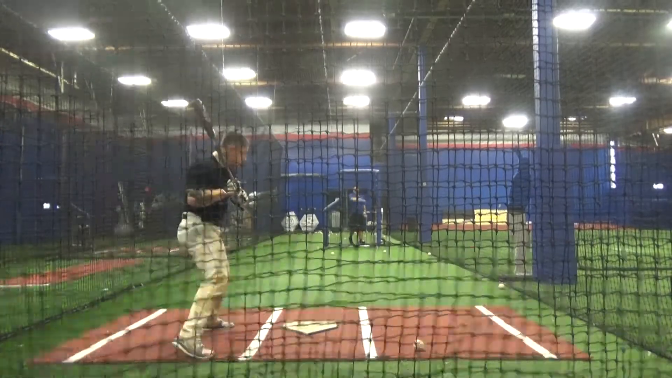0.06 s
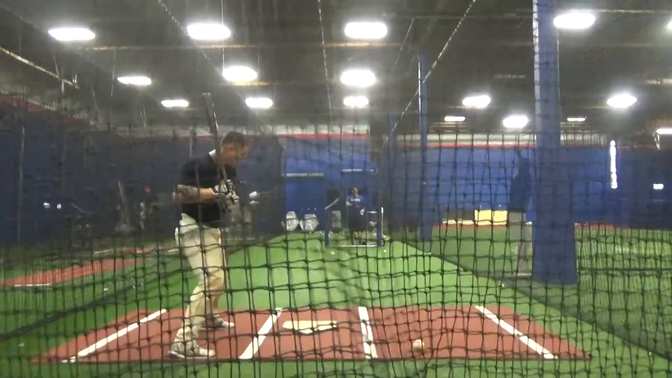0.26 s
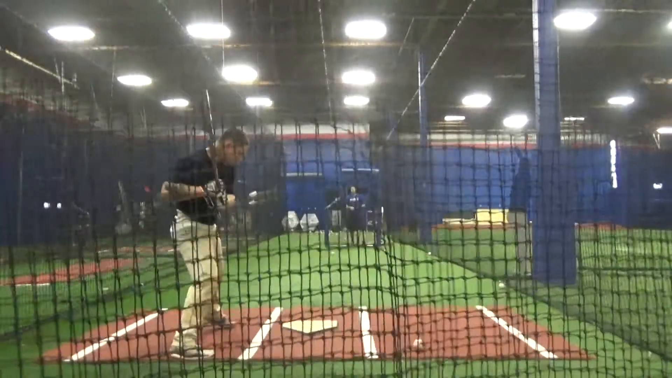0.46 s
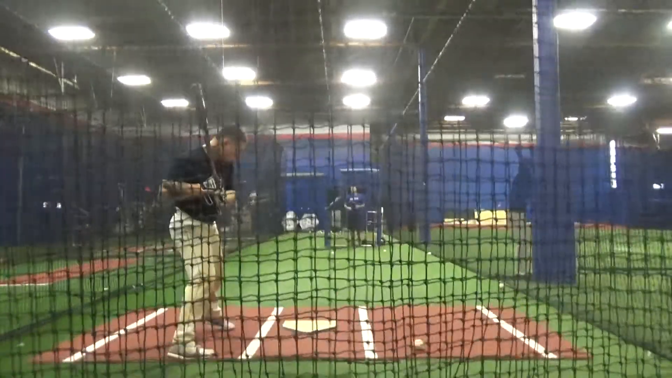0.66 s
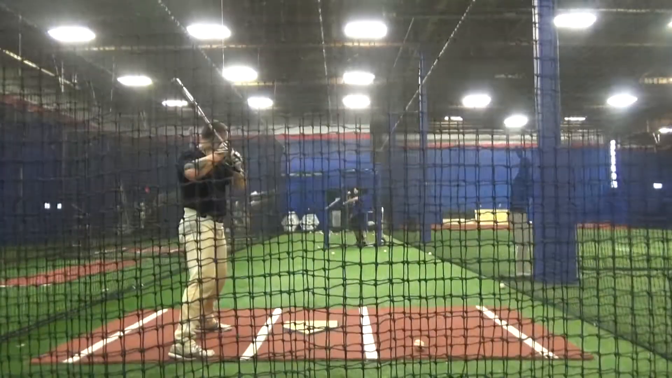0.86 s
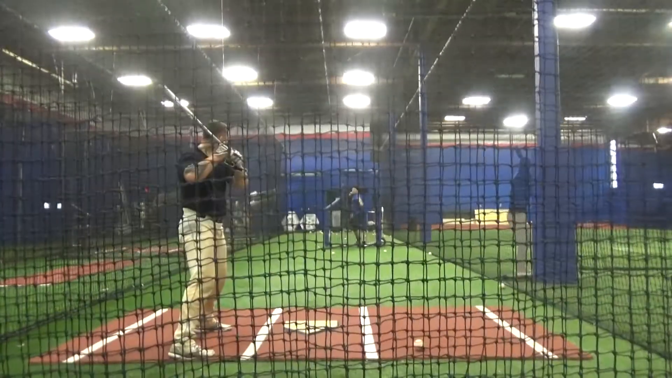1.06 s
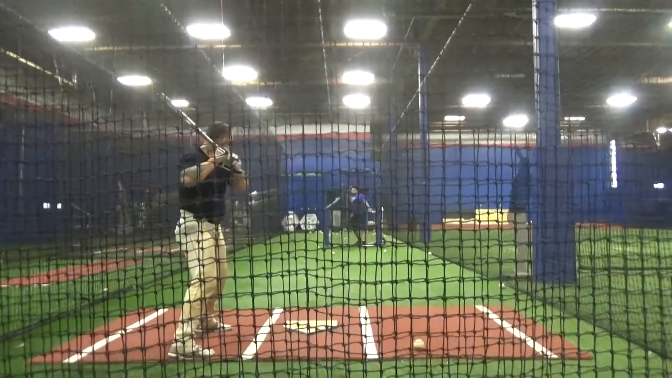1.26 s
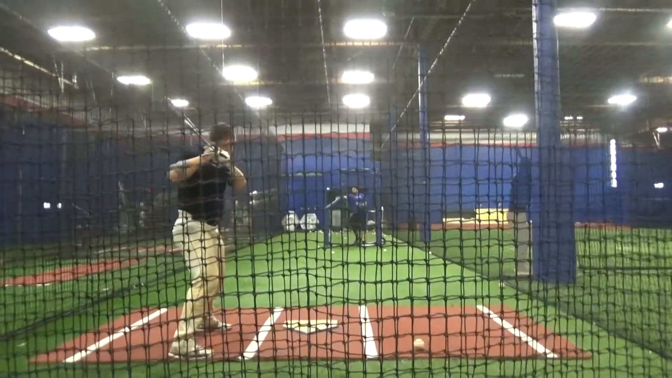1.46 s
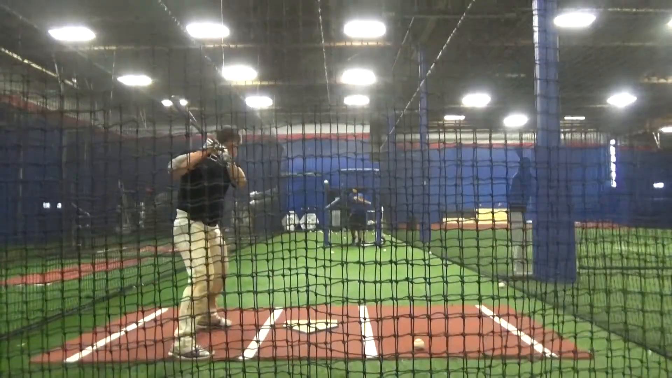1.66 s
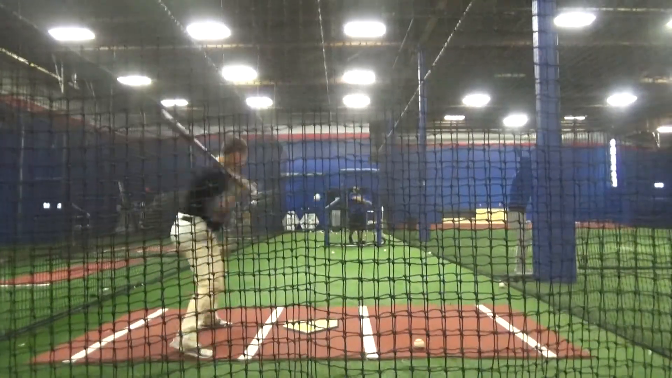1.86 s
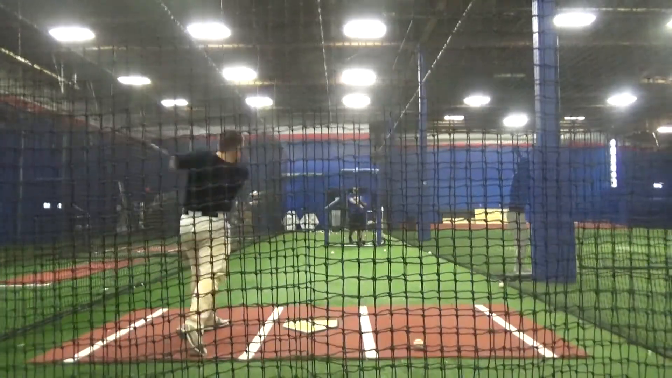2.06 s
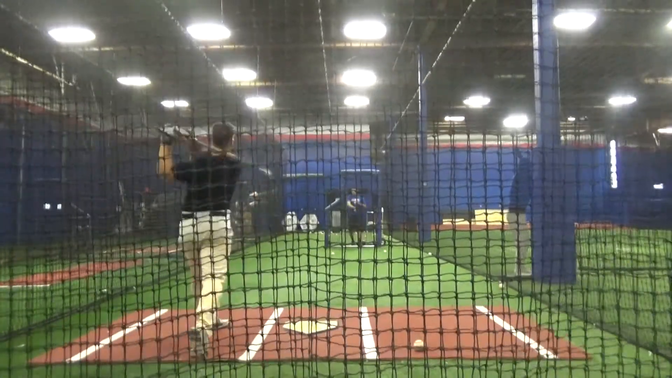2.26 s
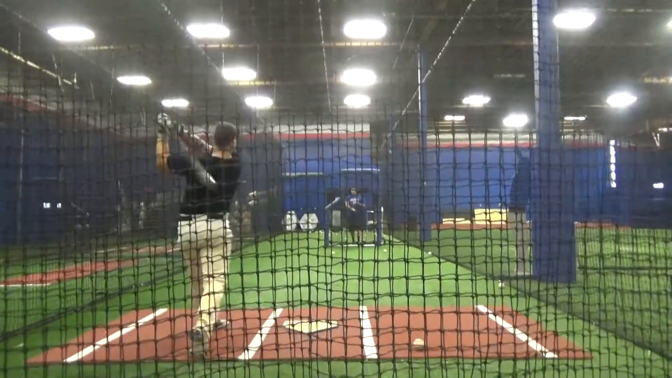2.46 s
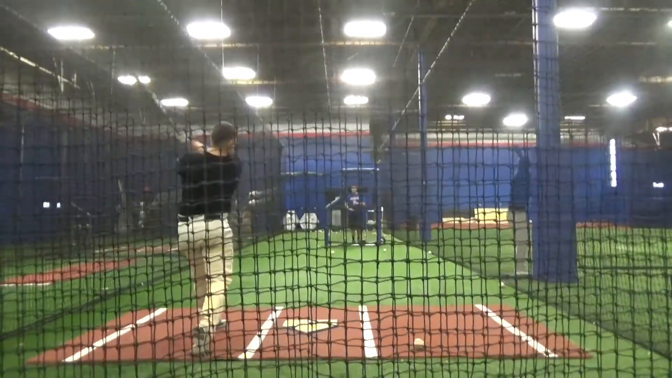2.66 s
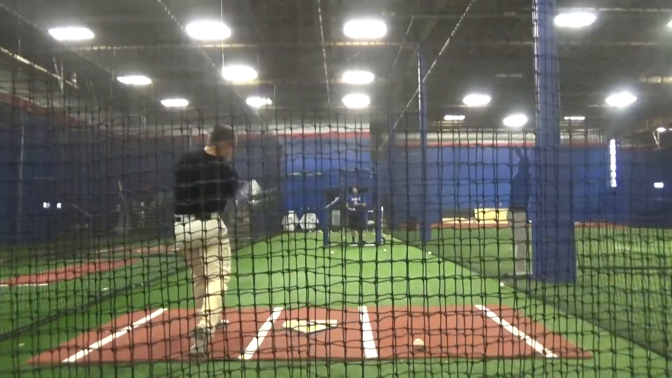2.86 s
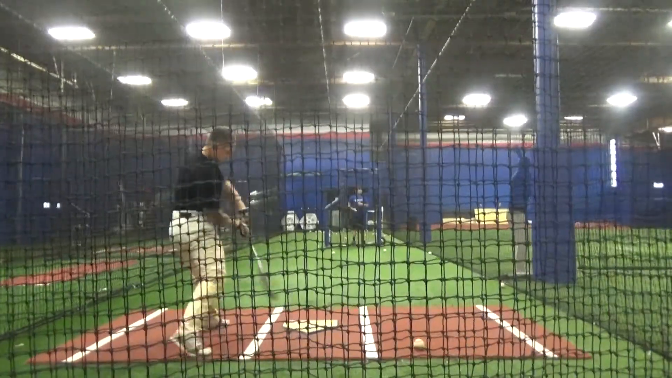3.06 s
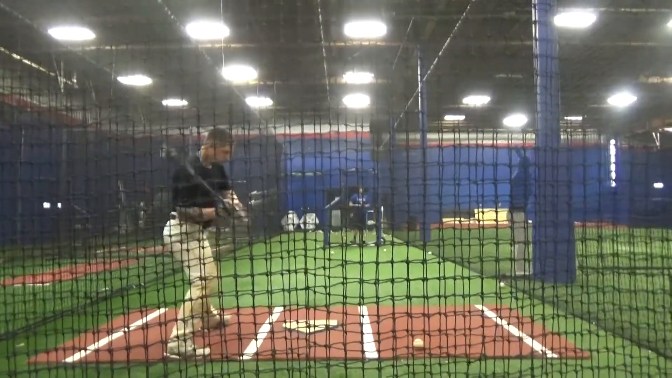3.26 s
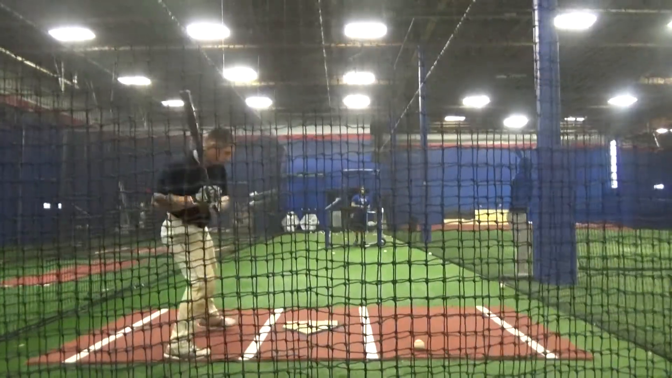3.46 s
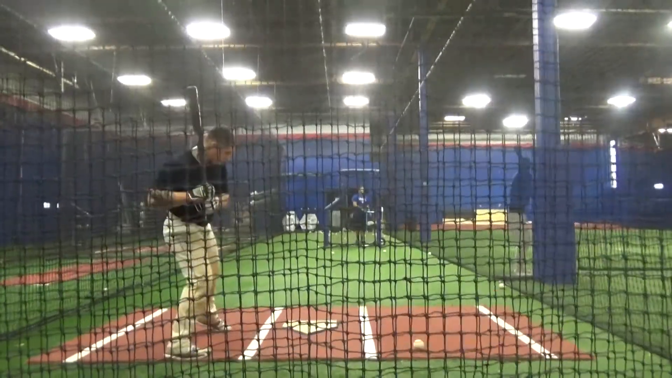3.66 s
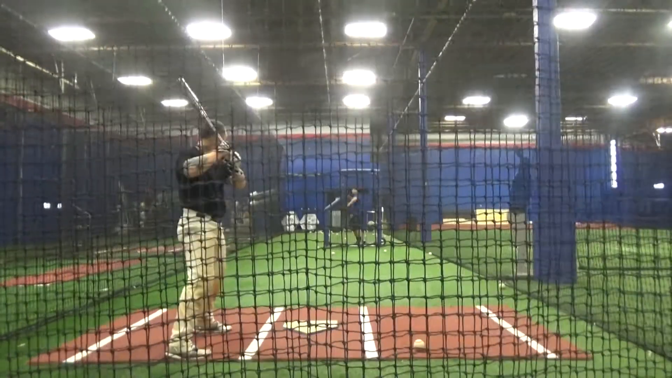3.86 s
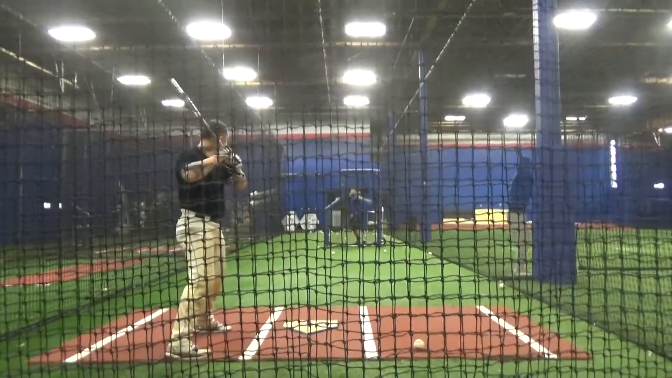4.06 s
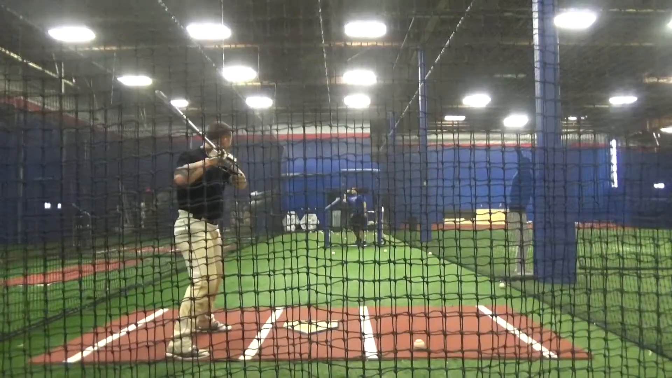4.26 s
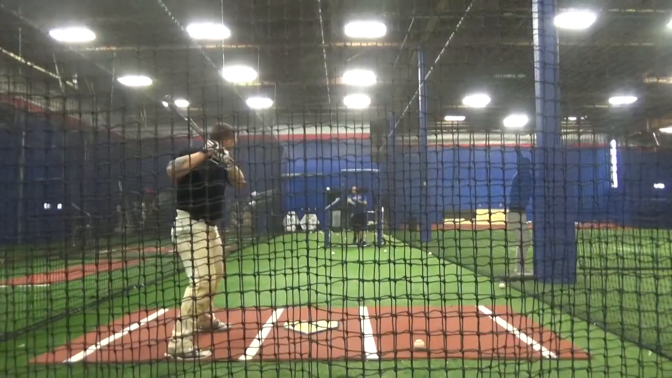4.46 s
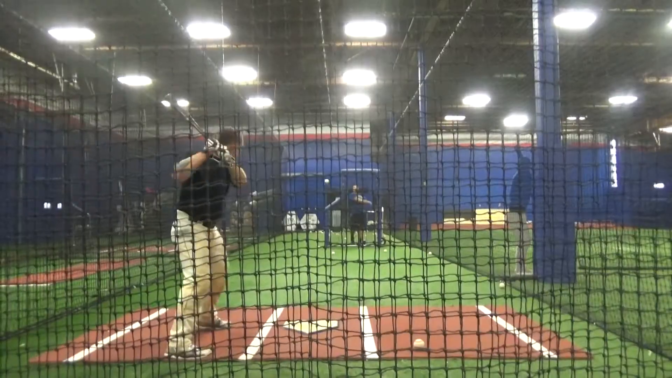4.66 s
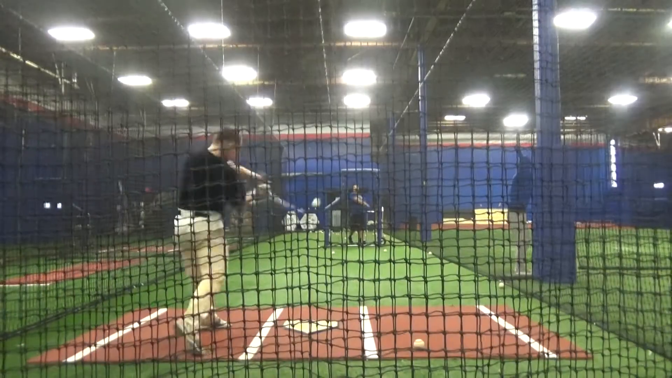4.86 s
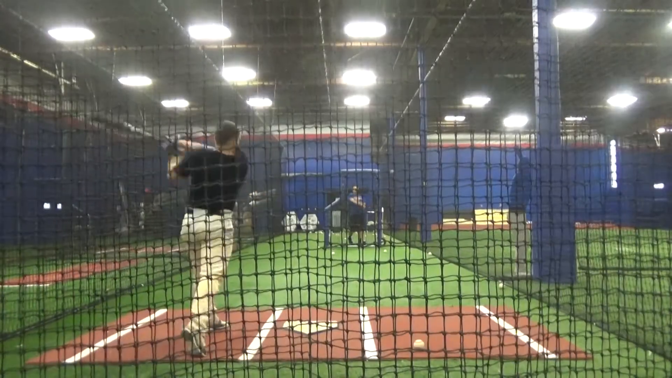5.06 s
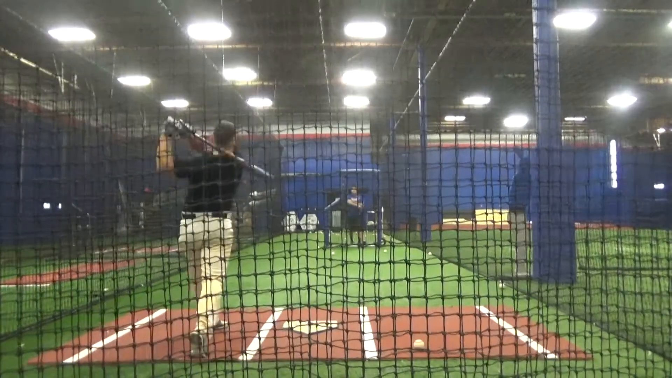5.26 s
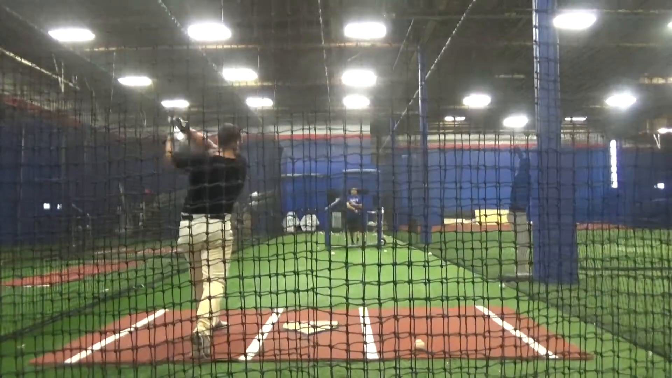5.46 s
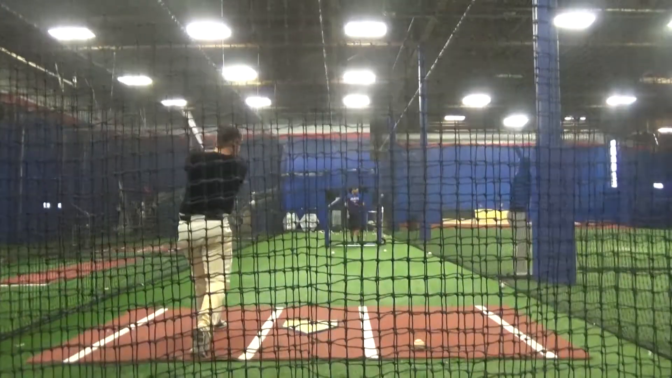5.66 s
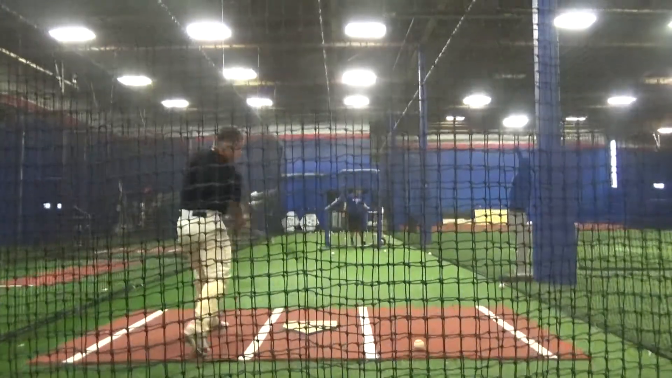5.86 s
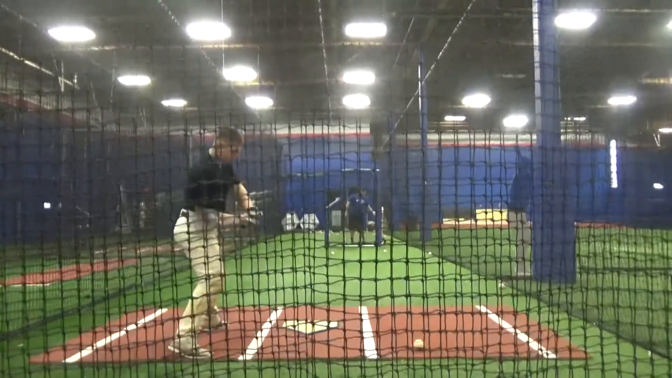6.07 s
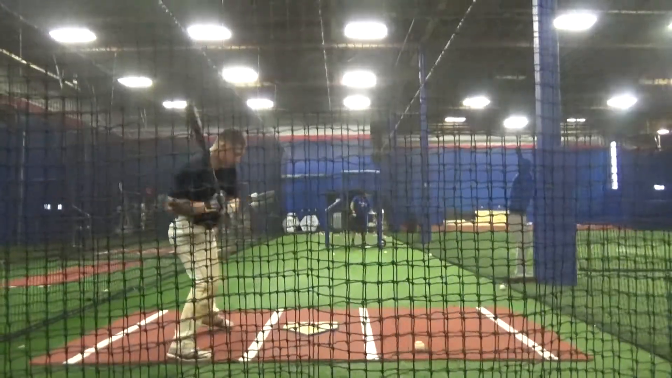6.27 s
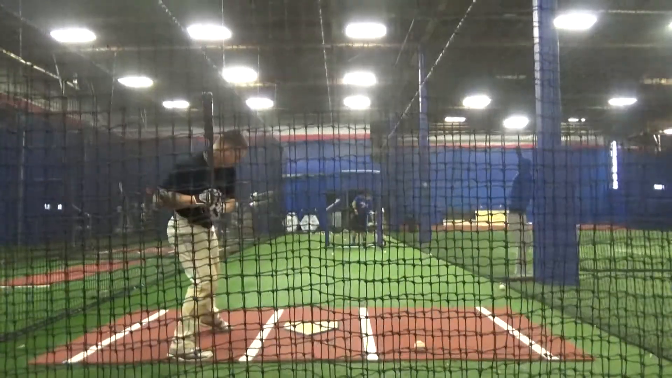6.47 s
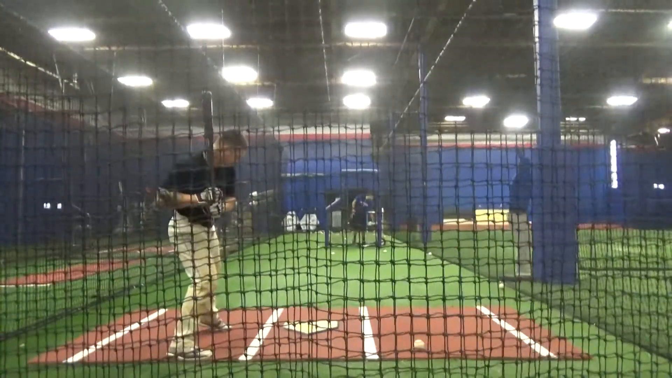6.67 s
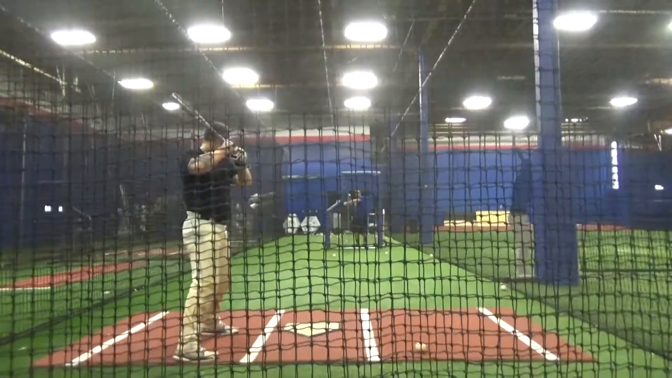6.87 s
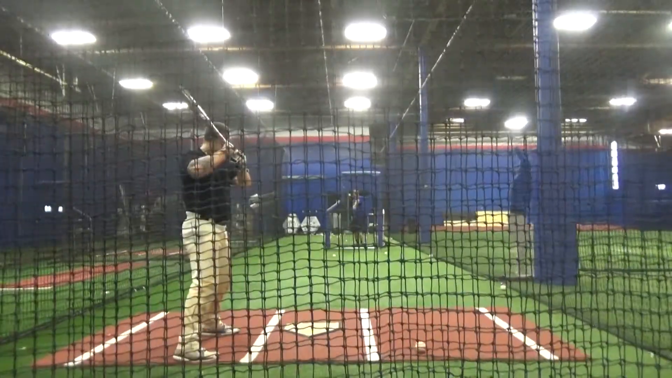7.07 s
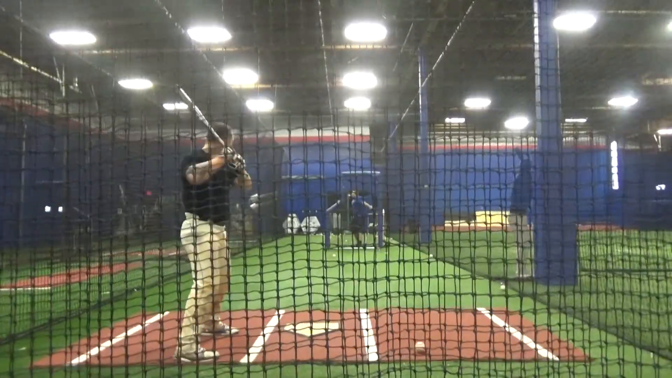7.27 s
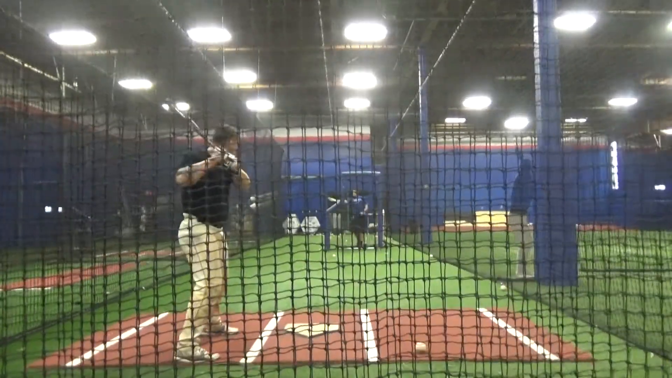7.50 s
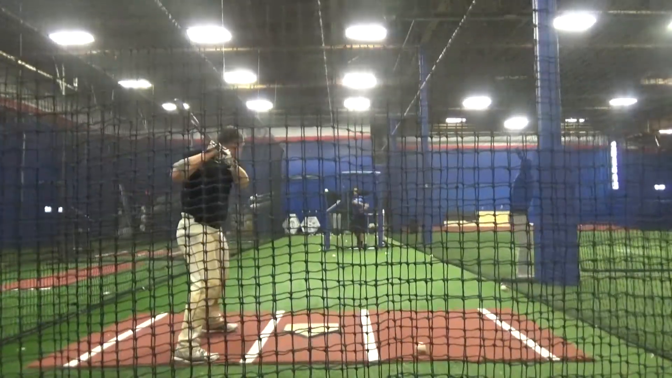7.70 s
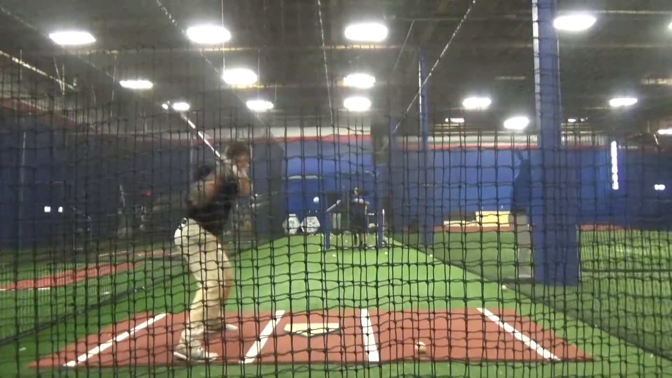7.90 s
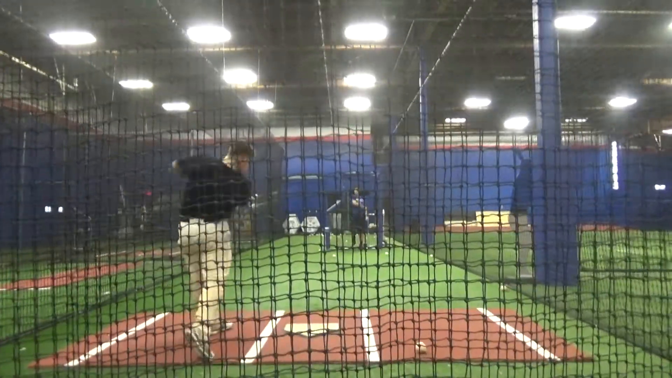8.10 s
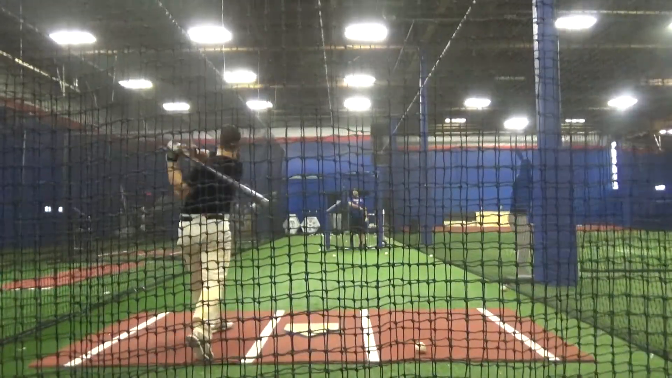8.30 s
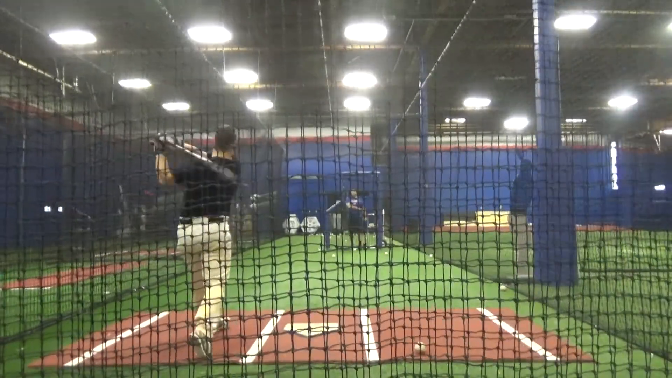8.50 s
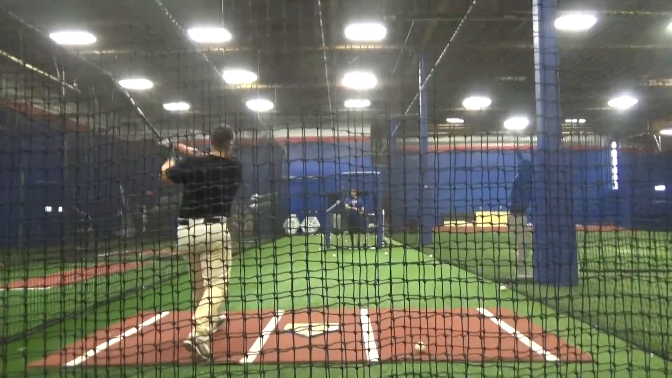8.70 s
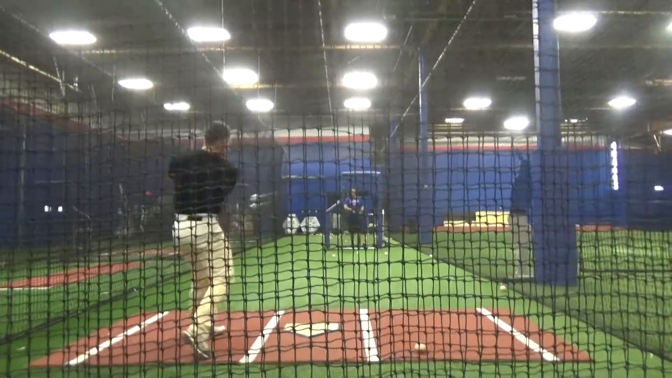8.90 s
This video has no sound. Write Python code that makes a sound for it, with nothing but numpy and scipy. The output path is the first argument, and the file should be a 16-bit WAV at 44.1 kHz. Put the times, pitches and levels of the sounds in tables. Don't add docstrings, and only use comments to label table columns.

```python
import sys
import numpy as np
from scipy import signal
from scipy.fft import irfft
from scipy.io import wavfile
from scipy.ndimage import uniform_filter1d

SR = 44100
rng = np.random.default_rng(int(sys.argv[2]) if len(sys.argv) > 2 else 0)


def ratio_of_db(decibels):
    return 10 ** (np.asarray(decibels, float) / 20)


def bounce(signal):
    frames = np.transpose(np.atleast_2d(signal))
    limited = np.clip(frames, -1, 1)
    pcm = np.round(limited * 32767).astype(np.int16)
    wavfile.write(sys.argv[1], SR, pcm)


N = 394254

# start in seconds, air level in dB, fidgeting level in dB, fidgeting brightness in dB per #
# octave, far hiss in dB.
TAKES = [
    (0, -65, -68, 0.5, -1),
    (.765, -66, -86.5, -1, .5),
    (3.77, -66, -88, -4, .5),
    (6.774, -66.5, -74, -3.5, 6.5),
]
# time in seconds, fade out in seconds, fade in in seconds.
CUTS = [(.765, 0.036, 0.024), (3.77, 0.029, 0.027), (6.774, 0.027, 0.033)]
# frequency in Hz, density in dB per Hz.
AIR_COLOUR = [(15, -72.5), (25, -36), (76, -21), (102, -4), (134, -12.5), (185, -1), (335, -10.5),
              (489, -7), (591, -8.5), (1160, -10.5), (2550, -14), (6380, -20), (16000, -38.5)]
# frequency in Hz, side against mid in dB.
WIDTH = [(60, -17.5), (110, -17), (200, -36.5), (380, -18), (700, -12), (1290, -6.5), (2380, -8),
         (4400, -9), (8120, -11), (15000, -26)]
# frequency in Hz, gain in dB.
MIC = [(20, -32.5), (100, -9), (300, -5), (1000, 2.3), (9000, 0.6), (12500, -2), (15500, -10.5),
       (16200, -56.5)]

# frequency in Hz, density in dB per Hz.
RUSTLE_COLOUR = [(880, -17.5), (1500, -5), (2740, -2), (3770, -4.5), (5330, -7), (9560, -9.5),
                 (12000, -17.5), (16000, -36)]
# peak in seconds, level in dB, rise in seconds, fall in # seconds,
# brightness in dB per octave.
MOVES = [(.134, -51.5, .06, .2, 10), (.47, -60, .02, 0.042, -4.5), (0.506, -48, .012, .025, 4),
         (.872, -57.5, .004, .012, 6), (1.304, -65, .006, .01, 1), (1.448, -71.5, .025, .2, 0.5),
         (2.998, -61.5, 0.28, .12, 2.5), (3.084, -65, 0.011, 0.17, 0.5), (3.208, -59.5, .06, .25, -6),
         (3.436, -57, 0.15, 0.027, 1.5), (3.606, -65, .3, 0.2, -2.5), (4.16, -76.5, .03, .017, -3.5),
         (4.442, -74.5, 0.41, 0.044, -2.5), (5.724, -65, 0.15, 0.083, -4), (5.882, -67, 0.2, .05, -3),
         (6.056, -65, 0.28, .5, 2), (6.358, -58.5, 0.14, 0.026, -0.2), (6.458, -69, .2, 0.096, -3),
         (6.634, -71, .05, .2, 2), (7.05, -76, 0.19, 2, 1)]
# lead before contact in seconds, then level, rise, fall, brightness as in MOVES.
STRIDE = (.19, -67.5, .075, 1.5, 3.5)

# time in seconds, low band in dB, high band in dB, left-right in dB.
SMACKS = [
    (0.039, -9.5, -14.5, 4),
    (0.0425, -15, -12, 2.5),
]
# centre in Hz, width in octaves, t60 in seconds.
SMACK_BANDS = [
    (3320, 1.3, .009),
    (7360, 0.65, 0.0061),
    (900, 1.6, .012),
]
# time in seconds, peak in dB.
CRACKLE = [(.0514, -24), (.0569, -22), (.0594, -24), (.0634, -29), (.0664, -29), (0.0742, -22),
           (0.078, -24), (0.082, -24.5), (0.087, -24.5), (0.122, -31)]
# time in seconds, peak in dB, pitch in Hz, left-right in dB.
TICKS = [(.1535, -39, 3500, 6), (.196, -33, 2830, 3), (.4364, -49, 6880, 1), (.4668, -43, 4500, 1.5),
         (.4738, -37, 8000, 3), (.5038, -24.5, 8400, 2.2), (.6315, -50, 2680, -5), (.8734, -54, 1920, 3),
         (1.7736, -52.5, 2690, 6), (1.7736, -51.5, 8500, 4), (1.81, -53, 7000, 0), (2.976, -44, 6870, .4),
         (3.1942, -37, 2650, -1.2), (5.375, -32, 6140, 3), (5.882, -46, 7910, -1.2), (6.0646, -45, 7200, 0),
         (6.2941, -50, 6140, -7), (6.4544, -53, 6000, -0.7), (6.6378, -50, 7280, 0.5),
         (6.6644, -49, 10500, 0), (6.855, -50, 3760, -4), (7.0587, -46.5, 3500, -6)]
# delay in seconds, pitch in Hz, level in dB after blow 1, 2, 3.
LATE = [(0.4894, 4300, -31, -33, -28), (.535, 3700, -26, -39.5, -40), (.556, 3550, -28, -28, -26),
        (.6758, 4350, -33.5, -31, -35), (0.701, 3900, -49.5, -31.5, -32), (.7202, 4800, -48, -45, -35)]
# time in seconds, peak in dB, low modes against high in dB,
# left-right in dB.
TAPS = [(0.177, -38.5, -3, -5), (0.3896, -34.5, -20, -4.5), (3.5582, -37, -5, -4),
        (6.2183, -39.5, -1.5, -3), (6.3688, -35.5, -3.5, -5), (6.5712, -31.5, -26, -3.5)]
# frequency in Hz, level in dB, t60 in seconds.
TAP_MODES = [(1030, 8.5, 0.013), (1390, 8.5, 0.013), (2170, -1.5, 0.021), (3570, 6.5, 0.0026),
             (5430, 0.5, 0.013), (8000, -29, .006), (10500, -25, .005)]
# time in seconds, level in dB, frequency in Hz, t60 in seconds.
KNOCKS = [(.176, -60, 260, .055), (0.5082, -34, 610, 0.019), (3.557, -45, 236, 0.035),
          (6.075, -43, 433, 0.024), (6.079, -56, 186, 0.076), (6.098, -39, 446, 0.034),
          (6.159, -51, 239, 0.052), (6.25, -49, 172, .07), (6.368, -48, 230, 0.04)]

# crack peak in dB, hall wash in dB, far echoes in dB, brightness in dB per octave,
# ring pitch factor.
BLOWS = [
    (-0.5, -18, -9, 0.64, 1.027),
    (-2.5, -17, -7, 1.2, 0.97),
    (-3, -16.5, -5, 1.36, 1.08),
]
# contact in seconds, take end in seconds.
CONTACT_AND_CUT = [(1.97465, 3.765), (4.91835, 6.775), (8.06575, 9.2)]
# frequency in Hz, t60 in seconds, level in dB in blow 1, 2, 3.
BARREL = [(1006, 0.034, -17, -18, -29), (1820, 0.012, -6, -1.5, -6), (2650, 0.0053, -1.5, -3.5, 4),
          (3430, 0.0035, 1, 4.5, 2), (4460, 0.0058, 0, -3, -7.5), (6650, 0.00059, -8.5, -17, 0),
          (9400, 0.003, -3.5, -6.5, -16)]
# frequency in Hz, density in dB per Hz.
WASH = [(90, -60.5), (150, -29.5), (350, -23.5), (470, -12), (830, -5.5), (1070, 1), (1380, -5.5),
        (1650, -0.5), (1950, -7.5), (2900, -6.5), (3900, -13), (5900, -13), (9500, -21.5), (15500, -44.5)]
# frequency in Hz, t60 in seconds.
HALL_T60 = [(100, .6), (300, 3.13), (600, 1.73), (1070, 2.384), (1350, 2.38), (1650, 2.71), (2100, 2.59),
            (3200, 2.22), (4200, 1.9), (6000, 1.12), (9000, 0.65), (14000, .55)]
# seconds after blow, level in dB.
ROOF = [(0, -30), (.004, -11), (.012, -13), (.019, -12), (.0235, 1.5)]
# seconds after blow, level above late decay in dB.
BUILD = [(0.059, 4.5), (.11, 3), (.19, 1.5), (.25, -0.5), (.45, 0.62), (3, 3)]
# delay in seconds, level against crack in dB, left-right in dB.
ECHOES = [(.0235, -9, 1), (.04, -7, -1), (.059, 0, 1), (.097, -7, -1), (.111, -6, 1), (.123, -8, 1),
          (.1445, 3, -1), (.1615, -9, 1), (.1715, -7, 1), (.1985, -3, -1)]

# time in seconds, level in dB, decay in dB a second, colour centre in Hz,
# thud in dB.
NET = [
    (2.449, -47, 10, 5700, -56),
    (5.241, -43, 32, 5900, -50),
    (8.353, -31.5, 148, 10500, -32.5),
    (8.424, -49, 157, 10000, -47),
    (8.548, -49, 205, 11500, -46.5),
    (8.685, -61, 157, 10900, -45),
    (8.905, -65.5, 22, 8000, -64),
]
# time in seconds, level in dB, frequency in Hz.
CLIPS = [(8.4094, -47, 11250), (8.4594, -54, 11250), (8.5091, -41.5, 11250), (8.6094, -51, 11250),
         (8.6194, -53, 12180), (8.6394, -57, 8950), (8.6694, -57, 8950), (8.6767, -58.5, 11250),
         (8.7146, -59, 12180), (8.768, -56, 11250), (8.8208, -60, 12950)]

HISS_HZ, HISS_WIDE_HZ = 5700, 1200
MOVE_DROP_DB = 20
SNAP_LAG_S, SMACK_BODY_DB = 0.00054, -22.5
CRACKLE_HZ, CRACKLE_OCT, CRACKLE_T60_S, CRACKLE_PAN_DB = 8750, 0.83, 0.0074, 3
TICK_OCT, TICK_T60_S = 1.2, 0.0095
LATE_OCT, LATE_T60_S = 0.57, 0.014
SWISH_DB, SWISH_RISE_DB_PER_S = -48, 156
CORE_DB, CORE_S, CORE_WIDE_S = 3.5, 0.037, 0.014
SLAP, CLIP_T60_S = 0.15, 0.18
SIDES = np.array([[.5], [-.5]])


def evened(x):
    return x / np.sqrt(np.mean(x ** 2) + 1e-20)


def read(points, hz):
    f, value = np.transpose(points)
    return np.interp(np.log(hz + 1), np.log(f + 1), value)


def add(mix, s, sound):
    part = mix[..., round(s * SR):][..., :sound.shape[-1]]
    part += sound[..., :part.shape[-1]]


def band(x, order, edges_hz):
    return signal.lfilter(*signal.butter(order, edges_hz, "band", fs=SR), x)


def shape(x, db, size=256):
    overlap = size * 3 // 4
    hz, s, z = signal.stft(x, SR, nperseg=size, noverlap=overlap)
    y = signal.istft(z * ratio_of_db(db(hz[:, None], s)), SR, nperseg=size, noverlap=overlap)[1]
    return y[..., :x.shape[-1]]


def coloured(x, points, size=512):
    gain = ratio_of_db(read(points, np.fft.rfftfreq(size, 1 / SR)))
    taps = np.roll(irfft(gain), size // 2) * np.hanning(size + 1)[:-1]
    taps = taps[1:].reshape((1,) * (x.ndim - 1) + (-1,))
    return signal.oaconvolve(x, taps, "same", axes=-1)


def near(x):
    return coloured(x, MIC)


def spread(mid, side):
    side = coloured(side, WIDTH)
    return np.array([mid + side, mid - side])


def ring(hz, t60_s, seconds):
    t = np.arange(round(seconds * SR)) / SR
    return ratio_of_db(-60 * t / t60_s) * np.sin(2 * np.pi * hz * t)


def grains(count, per_s, spread_db):
    size_db = spread_db * np.minimum(rng.exponential(1, count), 5)
    size = ratio_of_db(size_db) * rng.standard_normal(count)
    return evened(size * (rng.random(count) < per_s / SR))


def this_take():
    rows = np.array(TAKES)
    return rows[np.searchsorted(rows[1:, 0], np.arange(N) / SR)].T


def air():
    patches = uniform_filter1d(rng.standard_normal((513, N // 256 + 9)), 12, 0)
    patches = evened(uniform_filter1d(patches, 14, 1))
    _, air_db, _, _, hiss_db = this_take()

    def colour(hz, s):
        hiss = np.exp(-((hz - HISS_HZ) / HISS_WIDE_HZ) ** 2) * np.interp(s * SR, np.arange(N), hiss_db)
        return read(AIR_COLOUR, hz) + 1.5 * patches[:, :len(s)] + hiss

    hum = evened(shape(rng.standard_normal((2, N)), colour, size=1024))
    return spread(*hum) * ratio_of_db(air_db + 3.0)


def rustle():
    t = np.arange(0, N, 32) / SR
    _, _, fidget_db, fidget_tilt_db, _ = this_take()[:, ::32]
    level = ratio_of_db(fidget_db)
    tilt_sum = level * fidget_tilt_db
    strides = [(contact - STRIDE[0], *STRIDE[1:]) for contact, _ in CONTACT_AND_CUT]
    for s, db, rise_s, fall_s, tilt_db in MOVES + strides:
        move = ratio_of_db(db - MOVE_DROP_DB * np.maximum((s - t) / rise_s, (t - s) / fall_s))
        level = level + move
        tilt_sum = tilt_sum + move * tilt_db

    def colour(hz, s):
        return read(RUSTLE_COLOUR, hz) + np.interp(s, t, tilt_sum / level) * np.log2(hz / 9000 + 0.081)

    fine = np.array([grains(N, 14000, 1.3), grains(N, 14000, 2.4)])
    fine = evened(shape(fine, colour))
    return spread(*fine) * np.interp(np.arange(N) / SR, t, level) * ratio_of_db(2.5)


def snap(db, hz, octaves, t60_s, pan_db):
    puff = rng.standard_normal(1500) * ratio_of_db(-60 * np.arange(1500) / SR / t60_s)
    half = 2 ** (octaves / 2)
    tick = band(puff, 2, [hz / half, min(hz * half, 18000)])
    return tick / abs(tick).max() * ratio_of_db(db + pan_db * SIDES)


def near_net(dry):
    low, high, body = SMACK_BANDS
    for s, low_db, high_db, pan_db in SMACKS:
        smack = snap(low_db, *low, pan_db) + snap(high_db, *high, pan_db)
        add(dry, s + SNAP_LAG_S, smack + snap(low_db + SMACK_BODY_DB, *body, pan_db))
    for s, db in CRACKLE:
        add(dry, s + SNAP_LAG_S, snap(db, CRACKLE_HZ, CRACKLE_OCT, CRACKLE_T60_S, CRACKLE_PAN_DB))


def loose_snaps(dry):
    for s, db, hz, pan_db in TICKS:
        add(dry, s + SNAP_LAG_S, snap(db, hz, TICK_OCT, TICK_T60_S, pan_db))


def knocks(dry):
    t = np.arange(1500) / SR
    for s, db, hz, t60_s in KNOCKS:
        push = rng.standard_normal(1500) * ratio_of_db(-60 * t / t60_s) * np.minimum(t / t60_s / .15, 1)
        knock = np.convolve(ring(hz, 0.73 * t60_s, .2), push)
        add(dry, s, ratio_of_db(db) * knock[None] / abs(knock).max())


def taps(dry):
    for s, db, low_db, pan_db in TAPS:
        tap = sum(ratio_of_db(mode_db - 5.5 + low_db * (hz < 1600))
                  * ring(hz * rng.uniform(0.88, 1.02), min(t60_s, .011), .04)
                  for hz, mode_db, t60_s in TAP_MODES)
        contact = band(rng.standard_normal(len(tap)), 2, [1400, 6500])
        tap += 1.2 * contact * ratio_of_db(-6000 * np.arange(len(tap)) / SR)
        add(dry, s, tap * ratio_of_db(db + np.clip(pan_db, -6, 6) * SIDES))


def late_echoes(dry):
    for delay_s, hz, *levels_db in LATE:
        for db, (contact, _) in zip(levels_db, CONTACT_AND_CUT):
            add(dry, contact + delay_s, snap(db, hz, LATE_OCT, LATE_T60_S, 0))


def diffuse(dry, wet_db, length):
    hz, s, z = signal.stft(dry.mean(0), SR, nperseg=256, noverlap=192)
    power = uniform_filter1d(abs(z) ** 2, size=7, axis=0)
    keep = ratio_of_db(-120 * s[1] / (length * read(HALL_T60, hz)))
    held = np.array([signal.lfilter([0] * 6 + [1], [1, -k], p) for k, p in zip(keep, power)])
    held = held / np.mean(1 / (1 - keep))
    haze_db = 10 * np.log10(abs(held) * 256 / 1.5 + 1e-20) + wet_db
    haze = shape(rng.standard_normal((2, N)), lambda hz, s: haze_db)
    return near(dry + spread(*haze))


def ticks():
    dry = np.zeros((2, N))
    for source in (near_net, loose_snaps, knocks, taps, late_echoes):
        source(dry)
    return diffuse(dry, -14.5, 0.37)


def swish(t):
    def colour(hz, s):
        tilt = -4 * abs(np.log2(hz / 2500 + 0.022)) - 5 * (hz / 12000) ** 4
        return tilt + 6 * np.exp(-((hz - 8600) / 1700) ** 2) + 0 * s

    rush = shape(rng.standard_normal((2, len(t))), colour)
    return spread(*evened(near(rush))) * ratio_of_db(SWISH_DB + SWISH_RISE_DB_PER_S * t)


def crack(blow, pitch):
    barrel = sum(ratio_of_db(db[blow]) * ring(hz * pitch, t60_s, .03) for hz, t60_s, *db in BARREL)
    pushes = np.zeros(200)
    pushes[[6, 28, 80, 160]] = 0.31, -1.12, -0.6, -0.3
    out = near(np.convolve(barrel, pushes))
    out = signal.lfilter(*signal.butter(2, 900, "high", fs=SR), out)
    return out / abs(out).max()


def hall(bright_db):
    count = 2 * SR
    t = np.arange(count) / SR

    def dying(hz, s):
        late_db = -14 * np.exp(-np.maximum(s - .025, 0) / 0.0025) / (1 + (hz / 1100) ** 2)
        core_db = CORE_DB * np.exp(-((s - CORE_S) / CORE_WIDE_S) ** 2) / (1 + (hz / 1700) ** 4)
        return bright_db * np.log2(hz / 1500 + 0.029) - 60 * s / read(HALL_T60, hz) + late_db + core_db

    clumps = evened(uniform_filter1d(rng.standard_normal(count), 70))
    scatter = rng.standard_normal((2, count)) * ratio_of_db((1.2 + 1.6 * np.exp(-t / .4)) * clumps)
    returns = shape(coloured(scatter, WASH, size=1024), dying, size=512)
    wash = spread(*returns) * ratio_of_db(np.interp(t, *np.transpose(ROOF + BUILD)))
    return wash / np.std(wash[:, 2000:5000])


def far_echoes(sound, blow, level_db):
    far = band(blow, 2, [1300, 7800]) * ratio_of_db(-np.arange(len(blow)) / SR * 4300)
    far = far / abs(far).max()
    for delay_s, db, pan_db in ECHOES:
        add(sound, delay_s, far * ratio_of_db(level_db + db + pan_db * SIDES))


def bat():
    out = np.zeros((2, N))
    t = np.arange(-SR // 3, 0) / SR
    for k, (crack_db, wash_db, echo_db, bright_db, pitch) in enumerate(BLOWS):
        contact, end = CONTACT_AND_CUT[k]
        add(out, contact + t[0], swish(t))
        blow = crack(k, pitch)
        sound = ratio_of_db(wash_db) * hall(bright_db)
        add(sound, 0, ratio_of_db(crack_db) * blow * np.ones((2, 1)))
        far_echoes(sound, blow, crack_db + echo_db)
        add(out, contact, sound[:, :round((end - contact) * SR)])
    return out


def cords(out):
    t = np.arange(SR // 2) / SR
    for s, db, dies_db_per_s, centre_hz, thud_db in NET:
        def colour(hz, u):
            return -7 * abs(np.log2(hz / centre_hz + 0.045)) - 30 * u * (hz / centre_hz) ** 2

        fizz = np.array([grains(len(t), 20000, 1.5), grains(len(t), 18000, 2.2)])
        fizz = spread(*evened(shape(fizz, colour)))
        after_slap = np.maximum(t - SLAP / np.sqrt(dies_db_per_s), 0)
        fall = ratio_of_db(-dies_db_per_s * t - 4.54 * (1.5 - np.exp(-after_slap / 0.0046)))
        fall = fall * np.minimum(t / 0.0029, 1)
        thud = evened(band(rng.standard_normal(len(t)), 1, [200, 650]))
        thud = ratio_of_db(thud_db - 57.0 * t) * thud * np.minimum(t / 0.0091, 1)
        add(out, s, ratio_of_db(db + 4.5) * fizz * fall + thud)


def clips(out):
    for s, db, hz in CLIPS:
        add(out, s, ratio_of_db(db) * ring(hz, CLIP_T60_S, .2)[None])


def with_hall(dry, wet_db, length):
    noise = rng.standard_normal((2, SR))
    tail = spread(*shape(noise, lambda hz, s: -60 * s / (length * read(HALL_T60, hz))))
    tail[:, :400] = 0
    tail = tail / np.linalg.norm(tail[0])
    wet = signal.oaconvolve(dry.mean(0)[None], tail, axes=1)[:, :N]
    return near(dry + ratio_of_db(wet_db) * wet)


def net():
    out = np.zeros((2, N))
    cords(out)
    clips(out)
    return with_hall(out, -8.5, 1.0)


def scene():
    return air() + rustle() + ticks() + bat() + net()


def top_cut(x):
    return signal.sosfilt(signal.butter(12, 16800, fs=SR, output="sos"), x)


def record(dry):
    t = np.arange(N) / SR
    fade = np.ones(N)
    for s, out_s, in_s in CUTS:
        fade *= np.clip(np.maximum((s - t) / out_s, (t - s) / in_s), .01, 1) ** 2.3
    dry = signal.oaconvolve(dry, signal.firwin(255, 16300, fs=SR)[None], "same")
    mix = .9 * np.tanh(dry * fade / 0.94)
    return top_cut(mix)


dry = scene()
out = record(dry)
bounce(out)
```